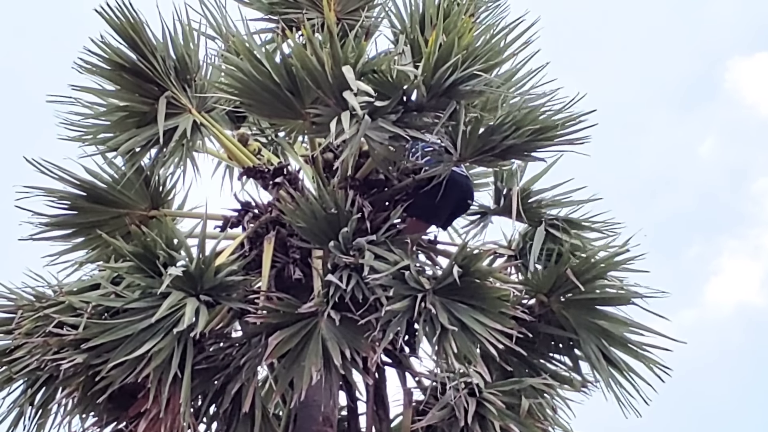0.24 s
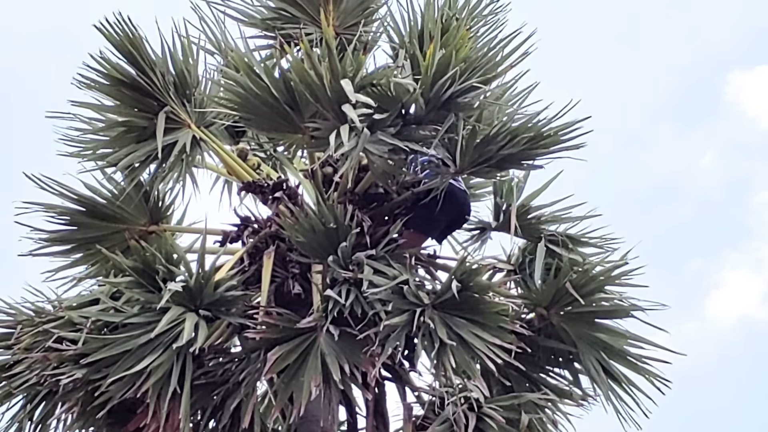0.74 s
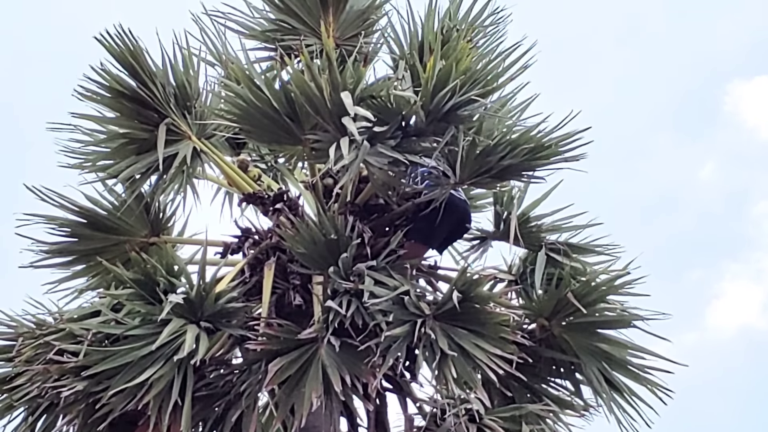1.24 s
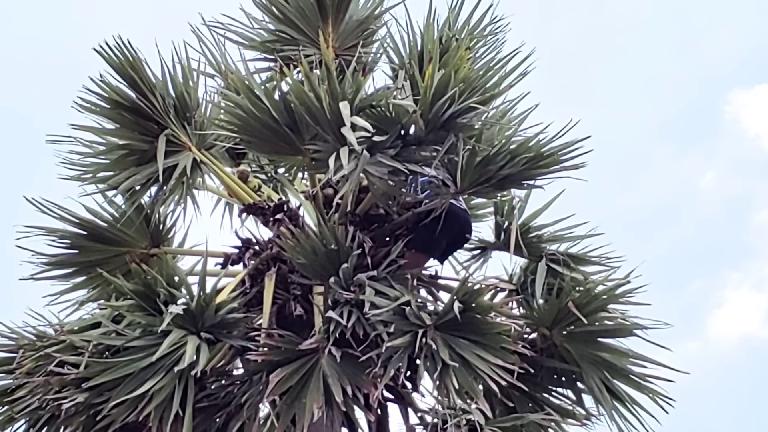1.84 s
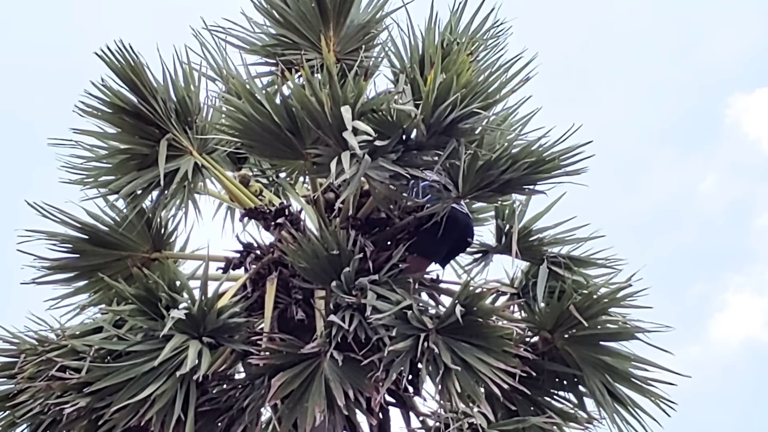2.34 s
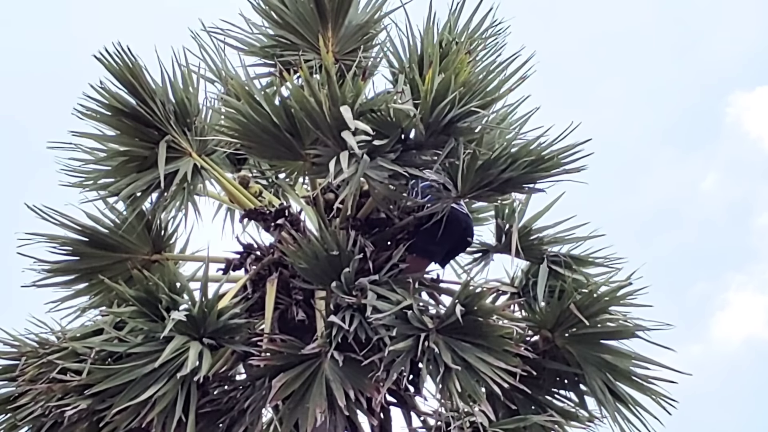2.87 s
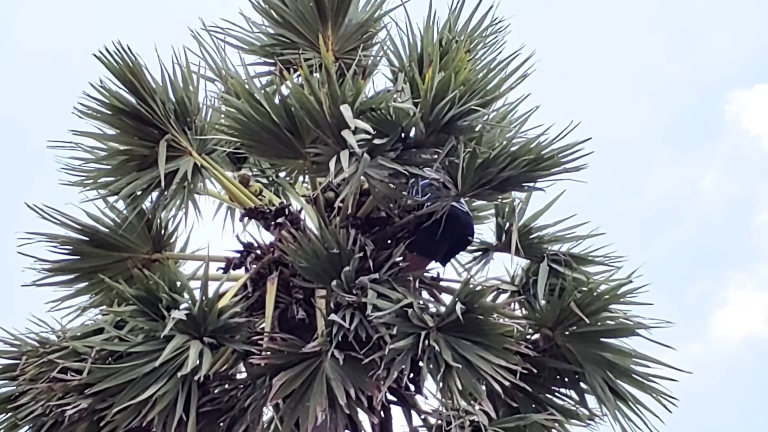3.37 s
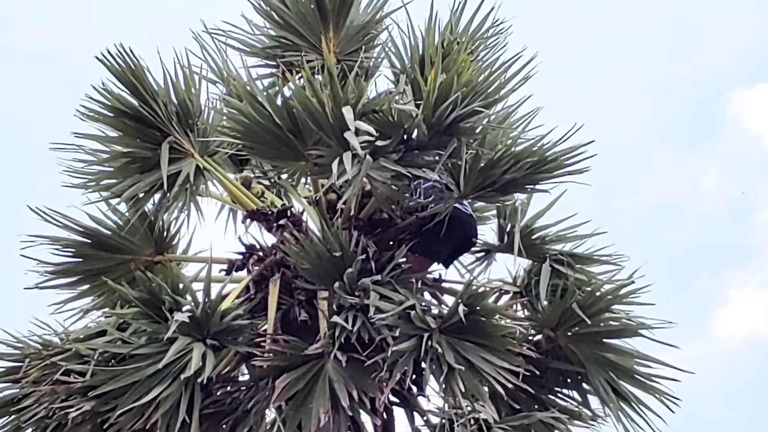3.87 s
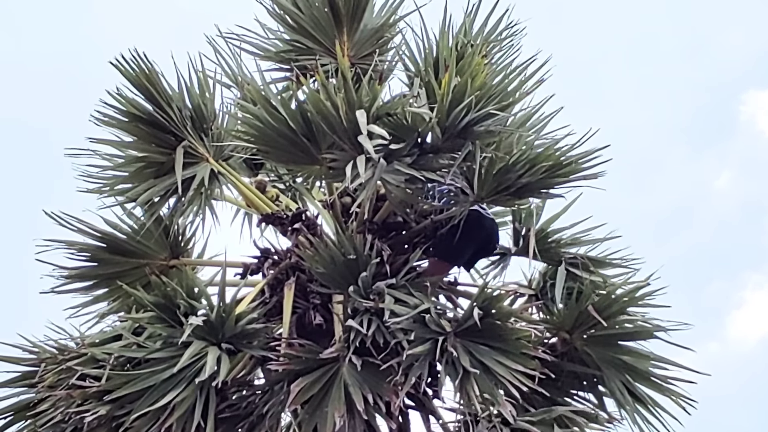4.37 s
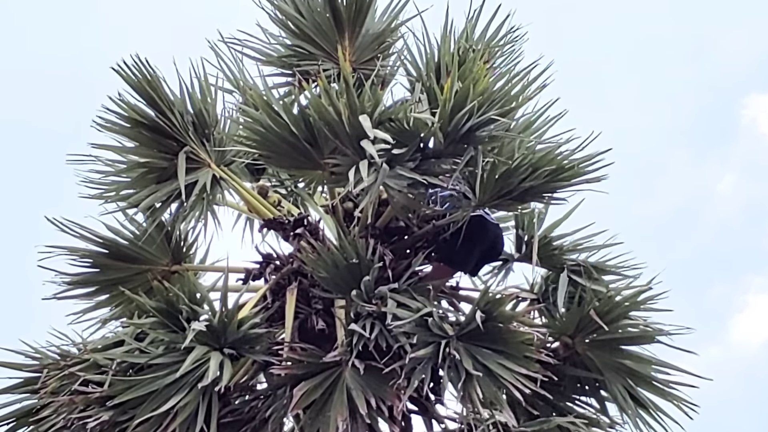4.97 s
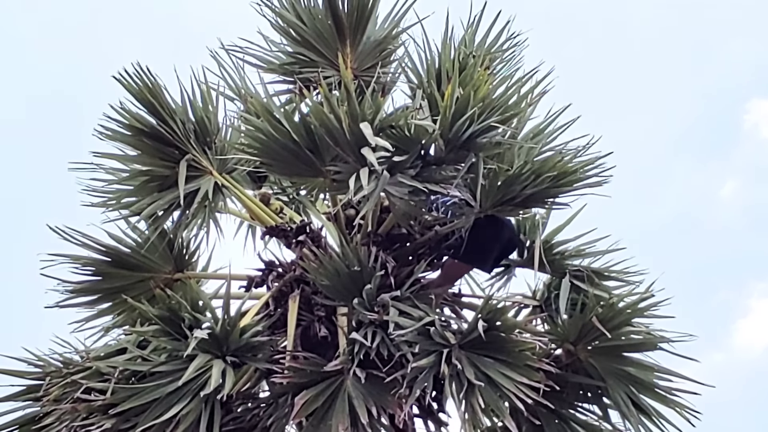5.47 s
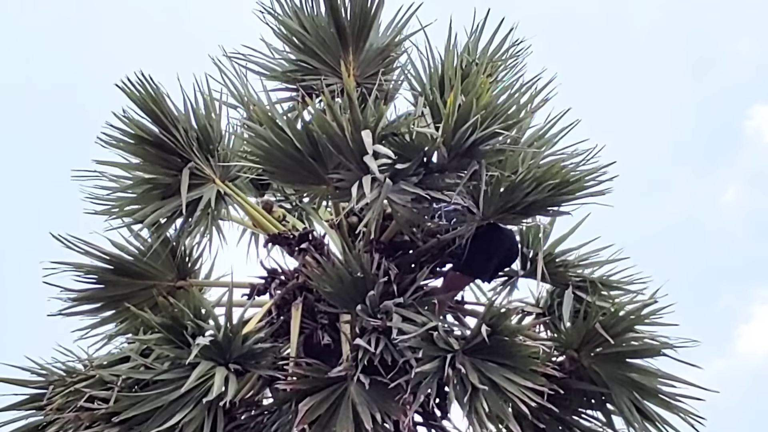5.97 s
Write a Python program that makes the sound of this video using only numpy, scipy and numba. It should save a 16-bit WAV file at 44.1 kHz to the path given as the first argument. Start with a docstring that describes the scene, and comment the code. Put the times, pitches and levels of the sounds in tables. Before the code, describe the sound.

Over a soft outdoor hiss, dry palm leaves stir faintly overhead, a stalk squeaks once and small birds chirp in falling pairs. Scattered dull knocks on wood come from the treetop. After about five seconds the fronds suddenly scrape, crackle and snap, ease briefly, then surge again at their loudest. The microphone is on the ground below the tree, and the foliage adds a short echo.

```python
"""Dry fan palm fronds crackle and snap as someone works in the crown, heard from the ground on a still day.
At first there are only light brushes of leaf, faint snaps, a stalk's squeak, a few dull knocks
and small birds chirping over quiet outdoor air. From five seconds on, the fronds are dragged about
in two surges: many tiny tears make a dense, hollow-toned crackle, and blades give way with loud snaps."""
import sys
import numpy as np
from scipy import signal
from scipy.fft import rfft, irfft, next_fast_len
from scipy.io import wavfile
from scipy.ndimage import uniform_filter1d
from numba import njit

SR = 44100
rng = np.random.default_rng(int(sys.argv[2]) if len(sys.argv) > 2 else 0)


def log_audio(samples):
    """Write samples as a 16-bit WAV file to the path given in sys.argv[1]."""
    # one column per channel
    frames = np.atleast_2d(samples).T
    # limit to full scale, then quantise
    limited = np.clip(frames, -1, 1)
    pcm = np.round(limited * 32767).astype(np.int16)
    wavfile.write(sys.argv[1], SR, pcm)


N = 273861
TIME = np.arange(N) / SR


def gain(db):
    """Turn decibels into a number to multiply by."""
    return 10 ** (np.asarray(db) / 20)


def unit(x):
    """Scale a sound to an average strength (rms) of 1."""
    return x / np.sqrt(np.mean(x ** 2))


def pan(left_db):
    """Left and right gains that make the left ear louder by left_db."""
    return gain(left_db * np.array([[.5], [-.5]]))


def swell(peak_s, db, half_length_s):
    """A smooth rise and fall in loudness."""
    return gain(db) * np.exp(-((TIME - peak_s) / half_length_s) ** 2)


def wander(turns_per_s):
    """A random curve that drifts around 0, typically by about 1."""
    step = int(SR / turns_per_s)
    return 1.37 * uniform_filter1d(np.repeat(rng.standard_normal(N // step + 1), step), step)[:N]


def colour(x, points):
    """Turn each pitch up or down along a curve of (pitch_hz, level_db) points."""
    hz, db = np.transpose(points)
    size = next_fast_len(N + 8192)
    bin_hz = np.maximum(np.arange(size // 2 + 1) * SR / size, 1)
    curve_db = np.interp(np.log(bin_hz), np.log(hz), db)
    return irfft(rfft(x, size) * gain(curve_db), size)[..., :N]


def band(x, hz, keep):
    """Keep the "low" or the "high" side of a pitch."""
    return signal.sosfiltfilt(signal.butter(2, hz, keep, fs=SR, output="sos"), x)


def resonate(x, hz, width_hz):
    """Let a sound ring at one pitch; a smaller width rings longer."""
    return signal.lfilter(*signal.iirpeak(min(hz, SR / 2 - 1), hz / width_hz, fs=SR), x)


@njit
def moving_peak(x, hz, width_hz):
    """Keep a narrow band around a pitch that changes over time."""
    out, band_state, low_state = np.empty(len(x)), 0., 0.
    for i in range(len(x)):
        tuning, damping = np.tan(np.pi * hz[i] / SR), width_hz / hz[i]
        peak = (band_state + tuning * (x[i] - low_state)) / (1 + tuning * (tuning + damping))
        band_state = 2 * peak - band_state
        low_state += 2 * tuning * peak
        out[i] = damping * peak
    return out


def leafy_echo(x, fade_s, echo_db):
    """The direct sound plus a soft tail thrown back by leaves and ground."""
    t = TIME[:SR // 2]
    tail = rng.standard_normal((2, len(t))) * np.exp(-t / fade_s)
    tail *= gain(echo_db) / np.sqrt(np.sum(tail ** 2, axis=1, keepdims=True))
    x = np.broadcast_to(x, (2, N))
    return x + signal.fftconvolve(x, tail, axes=1)[:, :N]


# The tone of outdoor air: pitch_hz, relative_db
AIR_COLOUR = [(15, -45), (25, -25), (86, 0.5), (129, -1.5), (164, 0), (313, -3), (445, -10.5), (703, -9),
              (945, -17), (2490, -18.5), (4870, -31), (6210, -24.5), (8580, -50.5), (11200, -20.5),
              (15500, -22.5)]
def outdoor_air():
    """A low murmur wavers and slowly sinks under a steady hiss, a little louder on the right."""
    noise = unit(colour(rng.standard_normal((2, N)), AIR_COLOUR)) * pan(left_db=-2.2)
    murmur = band(noise, 690, "low")
    hiss = noise - murmur
    murmur_db = -62.5 - 1.13 * TIME + 2.3 * wander(6.7)
    return hiss * gain(-65) + unit(murmur) * gain(murmur_db)


def tiny_tears(per_s, spread_db, fade_s=0.0021):
    """Dry leaf tears at random moments; each tear is a very short hiss of uneven size."""
    happens = rng.random(N) < per_s / SR
    size = happens * gain(spread_db * np.minimum(rng.exponential(size=N), 4))
    power = signal.lfilter([1], [1, -np.exp(-2 / (fade_s * SR))], size ** 2 + 1e-12)
    return np.sqrt(power) * rng.standard_normal((2, N))


# The tone of dry leaf: pitch_hz, relative_db
LEAF_COLOUR = [(35, -18), (65, -5), (110, -1), (240, -7), (420, -11), (620, -4), (1000, -5), (1280, -8),
               (2300, -6), (4500, -6), (7000, -5.5), (9800, -14.5), (11700, -7.5), (15500, -18.5)]
# How differently the crown reaches the two ears: pitch_hz, side_minus_mid_db
CROWN_WIDTH = [(60, -13), (120, 4), (200, -19), (380, -40), (750, -21), (1000, -5), (1280, 2.5), (2000, 1),
               (4700, -3.5), (6700, 2.5), (8500, 4), (15000, 0.5)]
def dry_leaf(clicks):
    """Give clicks a leafy tone; mid (shared by the ears) and side (their gap) become left and right."""
    mid, side = colour(clicks, LEAF_COLOUR)
    side = colour(side, CROWN_WIDTH)
    return np.array([mid + side, mid - side]) / np.std(mid)


# How strongly the leaves stir: time_s, relative_db
STIR_LEVELS = [(0, -62.5), (.75, -62.5), (1.12, -69), (1.4, -64.5), (1.95, -72), (2.45, -65.5),
               (3.1, -71.5), (3.95, -69), (4.1, -66), (4.7, -66.5), (4.95, -70.5)]
def stirring_leaves():
    """Leaves rub softly and dully while the climber hardly moves."""
    db = np.interp(TIME, *np.transpose(STIR_LEVELS))
    dull_tone = [(200, -3), (600, 2.5), (1000, 2.5), (2000, -3), (3500, -5), (6000, -13), (14000, -15)]
    rubbing = colour(dry_leaf(tiny_tears(per_s=1200, spread_db=-1.5)), dull_tone)
    return unit(rubbing) * gain(db - 4.5 + 2 * wander(19))


def bird_note(start_s, length_s, lowest_hz, fall, falling_share, db, waver):
    """One wavering note that can slide down to its lowest pitch and is loudest near its end."""
    out, on = np.zeros(N), (TIME > start_s) & (TIME < start_s + length_s)
    progress = (TIME[on] - start_s) / length_s
    slide = np.maximum(1 - progress / falling_share, 0) ** 0.95
    hz = lowest_hz * (1 + fall * slide) * (1 + waver[on])
    loudness = np.interp(progress, [0, .12, .6, .8, 1], [0, .4, .6, 1.3, 0])
    out[on] = gain(db) * loudness * np.sin(2 * np.pi * np.cumsum(hz) / SR)
    return out


# Thin, raspy bird whistles: start_s, length_s, pitch_hz, relative_db
BIRD_WHISTLES = [(0, .077, 7170, -57), (0, .023, 6220, -55), (0, .04, 4320, -63), (.19, .055, 1450, -69),
                 (2.337, .21, 3050, -76), (2.579, .093, 3530, -75.5)]
# Falling chirps: start_s, length_s, lowest_hz, fall_share_of_pitch, falling_share_of_length,
# relative_db, rasp_share_of_pitch
BIRD_CHIRPS = [(1.397, 0.084, 6260, 0.16, 0.78, -52, .008), (1.597, 0.059, 5500, 0.15, 0.72, -62, 0.013),
               (4.029, .093, 6270, .125, 0.92, -57.5, .008), (4.238, 0.08, 5230, .16, 0.52, -62.5, .011)]
def birds():
    """Small birds whistle faintly and chirp in high-low pairs; the foliage adds a blurred halo."""
    waver = wander(900)
    chirps = sum(bird_note(*chirp, rasp * waver) for *chirp, rasp in BIRD_CHIRPS)
    whistles = sum(bird_note(start_s, length_s, hz, 0, 1, db, 0.026 * waver)
                   for start_s, length_s, hz, db in BIRD_WHISTLES)
    song = (chirps + whistles) * gain(2.2 * wander(130))
    left = np.interp(TIME - 6.8e-5, TIME, song)  # reaches the left ear a touch later
    both_ears = np.array([left, song]) * pan(left_db=3)
    halo = leafy_echo(song * wander(1200), fade_s=.09, echo_db=10) * gain(-19.5)
    return leafy_echo(both_ears, fade_s=0.0074, echo_db=-0.5) + halo


def shifting_leaflets(x, bands=14):
    """Different leaflets keep touching, so each band of pitch swells and fades by itself."""
    size = next_fast_len(N)
    spectrum, hz = rfft(x, size), np.arange(size // 2 + 1) * SR / size
    band_number = np.interp(np.log(hz + 1), np.log(np.geomspace(600, 14000, bands)), np.arange(bands))
    out = np.zeros((2, N))
    for k in range(bands):
        part = irfft(spectrum * np.maximum(1 - abs(band_number - k), 0), size)[:, :N]
        out += part * gain(1.5 * np.clip(wander(70), -2, 2))
    return out


# Pitches that stand out in the crackle and give it a hollow tone: pitch_hz, width_hz, relative_db
CRACKLE_PEAKS = [(330, 30, 0.5), (524, 29, -0.5), (1034, 80, 7.5), (1453, 76, 4.5), (1862, 45, -0.5),
                 (2263, 124, 3.5), (2750, 100, -1), (3010, 30, -13), (3560, 440, -6.5), (4570, 51, 3)]
def crackle(per_s, spread_db):
    """Dense tears in which a few pitches stand out, alike in both ears; each drifts, comes and goes."""
    mid, side = shifting_leaflets(tiny_tears(per_s, spread_db))
    peaks = np.zeros(N)
    for hz, width_hz, db in CRACKLE_PEAKS:
        peak = moving_peak(mid, hz * (1 + 0.023 * wander(22)), float(width_hz))
        peaks += peak * gain(db + 1.5 + 3.5 * np.clip(wander(28), -1.5, 1.5))
    return dry_leaf(np.array([mid + peaks, side]))


# Dry blades snapping: start_s, relative_db, length_s, treble_db, pitch_hz, crack_db
BLADE_SNAPS = [(.002, -76, 0.064, 18, 6400, -20), (0.1417, -64.5, 0.0016, 12, 11100, 7.5),
               (0.143, -58.5, 0.018, 7, 8000, -14), (0.489, -74, 0.0048, 15.5, 12390, -16),
               (0.73, -78, 0.004, 15, 12900, 0), (4.664, -59, 0.019, 1, 2550, -16),
               (5.081, -45.5, 0.013, -19, 3600, -7), (5.106, -39, 0.017, -5.5, 1080, -1.5),
               (5.134, -49, 0.022, 3.5, 3360, -8.5), (5.183, -32.5, 0.023, -7, 3300, -9),
               (5.222, -35.5, 0.046, -1.5, 3050, -11), (5.27, -39, 0.021, -3, 4479, -3),
               (5.321, -39, 0.0072, 4, 3000, -15), (5.326, -34, 0.018, 2.5, 3900, -15),
               (5.35, -36, 0.016, 4, 4770, -2), (5.368, -35, 0.022, 2.5, 4330, -4),
               (5.431, -43.5, 0.031, 0, 1050, -8), (5.538, -37, 0.035, -8, 2241, -10),
               (5.616, -47.5, 0.038, -8, 2582, -6), (5.676, -46, 0.019, 0, 5600, -8),
               (5.822, -50.5, 0.024, -3, 3800, -8), (5.901, -43.5, 0.015, -8, 3500, -12),
               (5.943, -48, 0.016, -10, 3724, -10), (5.97, -46.5, 0.028, -6, 3700, -6),
               (6.01, -35, 0.062, -2, 1650, -13), (6.085, -33, 0.018, 7, 3000, -1),
               (6.1134, -27, 0.018, 2.5, 2800, -8), (6.174, -33, .02, -17, 4380, -10)]
def snapping_fronds():
    """A blade gives way with a crack, then a short burst of tears with a pitch of its own dies off."""
    rise_s, crack_fade_s = 0.00085, 0.0025
    tears = band(crackle(per_s=3300, spread_db=0.6), 280, "high")
    cracks = band(dry_leaf(rng.standard_normal((2, N))), 851, "high")
    out = np.zeros((2, N))
    for start_s, db, length_s, treble_db, hz, crack_db in BLADE_SNAPS:
        start = int(start_s * SR)
        t = TIME[:min(SR // 3, N - start)]
        span = slice(start, start + len(t))
        hold_s = 0.56 * length_s
        loudness = np.minimum(t / rise_s, 1) * np.exp(-np.maximum(t - hold_s, 0) / length_s)
        crack = cracks[:, span] * gain(crack_db) * np.exp(-t / crack_fade_s)
        snap = tears[:, span] * loudness + crack
        snap += gain(0.5) * resonate(snap, hz, width_hz=0.18 * hz)
        snap += (gain(treble_db) - 1) * band(snap, 5800, "high")
        out[:, span] += gain(db - 2.5) * snap
    return out


# Light scrapes of leaf on leaf: peak_s, relative_db, half_length_s, top_hz
LEAF_BRUSHES = [(0.112, -59.5, 0.019, 13000), (.663, -62, .007, 3200), (.7, -58, .035, 1410),
                (0.768, -74, .02, 4000), (0.9, -62.5, 0.013, 7100), (1.338, -68.5, .025, 4500),
                (4.573, -57.5, 0.017, 4800), (4.73, -66.5, 0.051, 7000)]
def brushing_leaves():
    """Leaves slide softly past each other, swelling and fading with no crack."""
    scraping = band(crackle(per_s=2900, spread_db=.5), 360, "high")
    return sum(band(scraping, top_hz, "low") * swell(peak_s, db, half_length_s)
               for peak_s, db, half_length_s, top_hz in LEAF_BRUSHES)


# Rubs of a stalk: peak_s, relative_db, half_length_s, roughness_share_of_pitch
STALK_RUBS = [(0.121, -57.5, 0.011, .11), (0.153, -49, 0.01, 0.012)]
def squeaking_stalk():
    """A stalk rubs twice on its neighbour: first a soft rasp, then a short, clear squeak."""
    out = np.zeros(N)
    for peak_s, db, half_length_s, roughness in STALK_RUBS:
        hz = 1130 * (1 + roughness * wander(600))
        out += np.sin(2 * np.pi * np.cumsum(hz) / SR) * swell(peak_s, db, half_length_s)
    return leafy_echo(out * gain(1.2 * wander(130)), fade_s=.006, echo_db=-2)


# Chops and taps on stalks and trunk: start_s, relative_db, pitch_hz, fade_s, width_hz, left_db
WOOD_KNOCKS = [(.618, -57, 850, .009, 500, 0), (.657, -59, 1030, .012, 690, -2),
               (.734, -52.5, 308, 0.035, 350, 0), (2.158, -49, 600, .004, 900, 0),
               (2.163, -47.5, 583, 0.017, 520, 5), (2.1672, -42, 550, 0.0016, 1100, -3),
               (2.168, -61, 1190, 0.0088, 1200, 1), (2.21, -58, 520, 0.02, 500, 3),
               (2.517, -43, 284, 0.0056, 290, -1), (2.526, -40.5, 280, 0.011, 278.4, -2.5),
               (2.556, -51, 130, 0.04916, 215, 0), (2.5625, -51.5, 1280, 0.0025, 750, 8),
               (2.5632, -44, 2800, 0.0023, 700, 11), (3.65, -56, 189, 0.13, 302, 2),
               (3.73, -52.5, 131, 0.039, 215, -2), (4.691, -61, 123, 0.18, 215, 7),
               (5.256, -40.5, 658, 0.02, 450, 0), (5.276, -35, 980, 0.028, 400, 1),
               (5.335, -44.5, 304, 0.051, 288, -1), (5.461, -43.5, 545, 0.041, 251.6, 1),
               (5.624, -37, 995, 0.01, 400.3, 0), (5.758, -56, 217, 0.02, 260, 11),
               (6.119, -40, 397, 0.065, 450, -1), (6.127, -30, 980, 0.032, 400, 0),
               (6.192, -27.5, 1150, .008, 700, 3)]
def knocks():
    """Struck wood gives one quickly dying note with a brief, noisy thud around it."""
    out, t = np.zeros((2, N)), TIME[:SR // 4]
    for start_s, db, hz, fade_s, width_hz, left_db in WOOD_KNOCKS:
        thud = rng.standard_normal(len(t))
        for _ in range(3):
            thud = resonate(thud, hz, 0.87 * width_hz)
        ring = np.sin(2 * np.pi * hz * t) * np.exp(-t * width_hz / 7)
        rise = 1 - np.exp(-(2 * t * width_hz) ** 2)  # a softer hit has less width and starts more slowly
        hit = gain(db) * (1.22 * ring + .5 * unit(thud)) * np.exp(-t / fade_s) * rise
        start = int(start_s * SR)
        out[:, start:start + len(t)] += hit[:N - start] * pan(left_db)
    return leafy_echo(out, fade_s=0.01075, echo_db=-7.5)


# How hard the fronds are dragged, in two surges: time_s, level_db
DRAG_LEVELS = [(5.0, -72.5), (5.065, -61), (5.115, -50), (5.18, -44.5), (5.21, -42), (5.385, -40.5),
               (5.41, -44), (5.52, -44.5), (5.66, -44), (5.8, -50.5), (5.935, -51.5), (5.99, -42.5),
               (6.105, -32.5), (6.21, -34)]
# Swings of the big fans: peak_s, level_db, half_length_s
FAN_SWINGS = [(5.359, -61, 0.016), (5.74, -55.5, 0.063), (6.128, -43.5, 0.082)]
def dragged_fronds():
    """Blades scrape and splinter, brighter when pulled harder; the big fans flap and push air."""
    db = np.interp(TIME, *np.transpose(DRAG_LEVELS))
    started = TIME > DRAG_LEVELS[0][0]
    effort_db = db + 43.5  # 0 is a firm pull
    pull = gain(db + 0.2 * wander(90)) * started
    scraping = crackle(per_s=2200, spread_db=0.2)
    treble, bass = band(scraping, 4530, "high"), band(scraping, 204, "low")
    body = unit(scraping - treble - bass)
    splinters = dry_leaf(tiny_tears(per_s=70, spread_db=1.5, fade_s=0.0055))
    crisp = unit(treble) + gain(-5.5) * unit(band(splinters, 3984, "high"))
    crisp *= gain(-3 + 1.1 * wander(40) + 0.9 * np.minimum(effort_db, 0))  # weaker pulls are duller
    swings = sum(swell(*swing) for swing in FAN_SWINGS)
    flapping = np.hypot(gain(db - 13.5 + 0.14 * effort_db) * started, swings)
    return (body + crisp) * pull + unit(bass) * flapping


def scene():
    """The palm's crown with its short echo, plus a squeak, knocks, birds and air."""
    crown = dragged_fronds() + snapping_fronds() + brushing_leaves() + stirring_leaves()
    crown = leafy_echo(crown, fade_s=0.015, echo_db=-7)
    return crown + squeaking_stalk() + knocks() + birds() + outdoor_air()


def record(dry):
    """Cut away the very highest treble, above 15250 Hz."""
    return signal.sosfilt(signal.ellip(10, .2, 80, 15250, fs=SR, output="sos"), dry)


dry = scene()
out = record(dry)
log_audio(out)
```